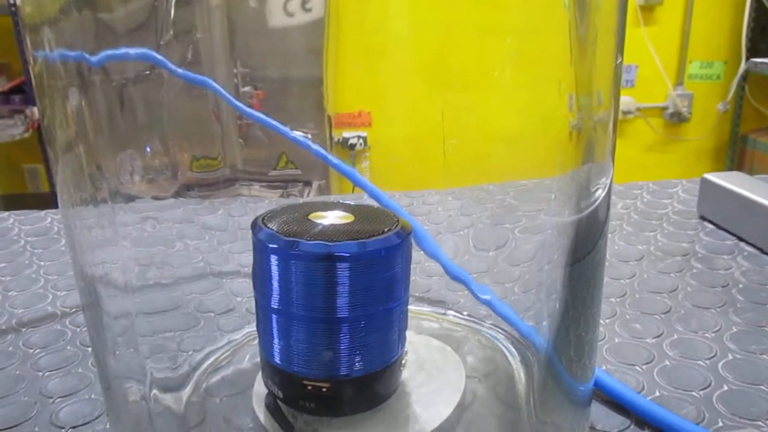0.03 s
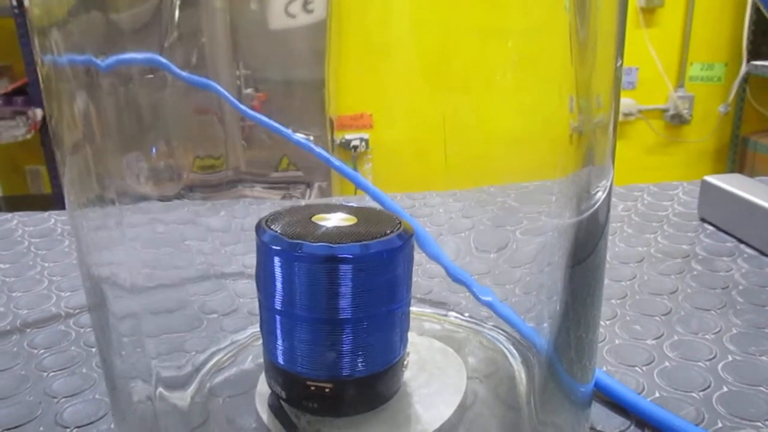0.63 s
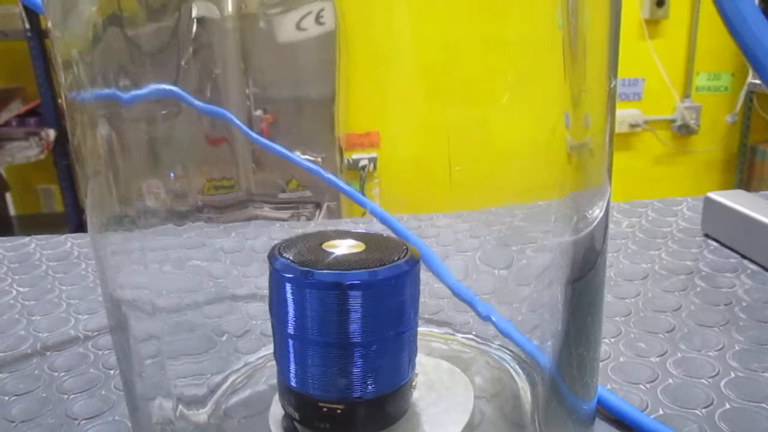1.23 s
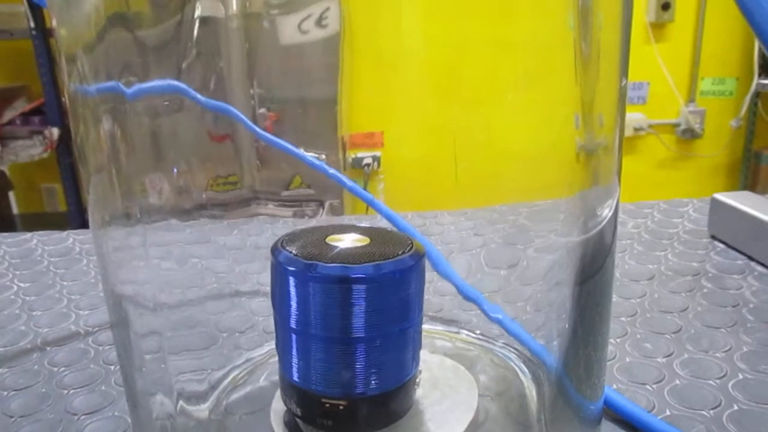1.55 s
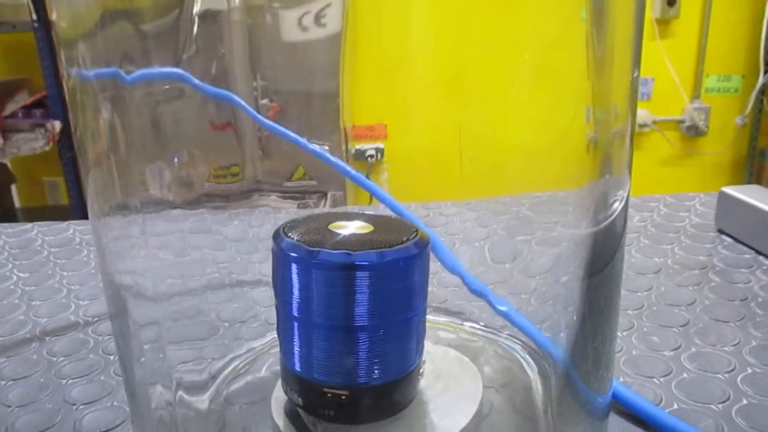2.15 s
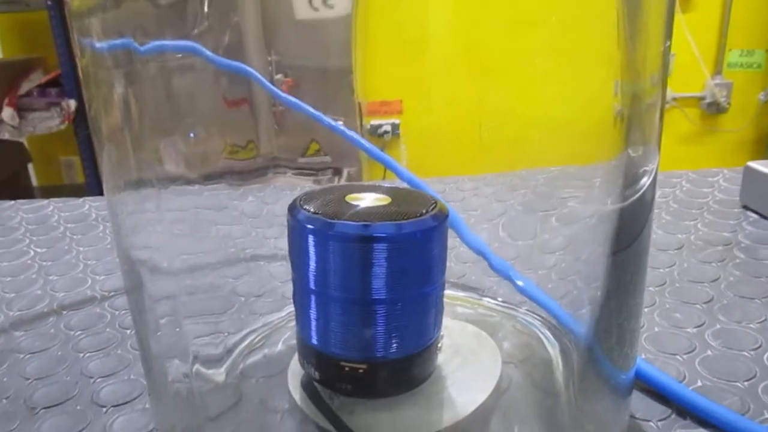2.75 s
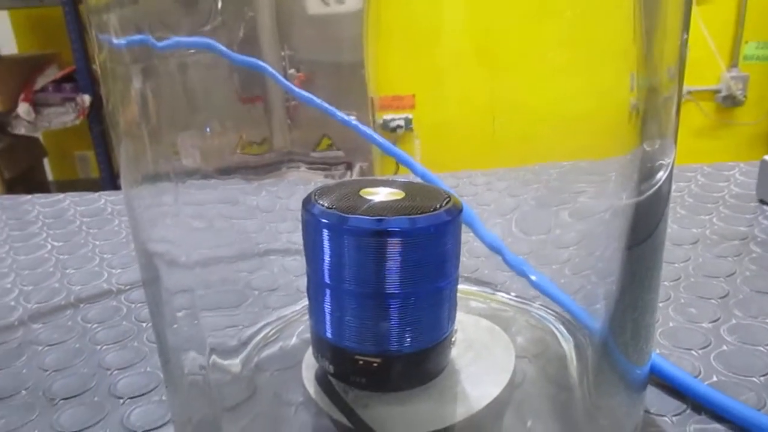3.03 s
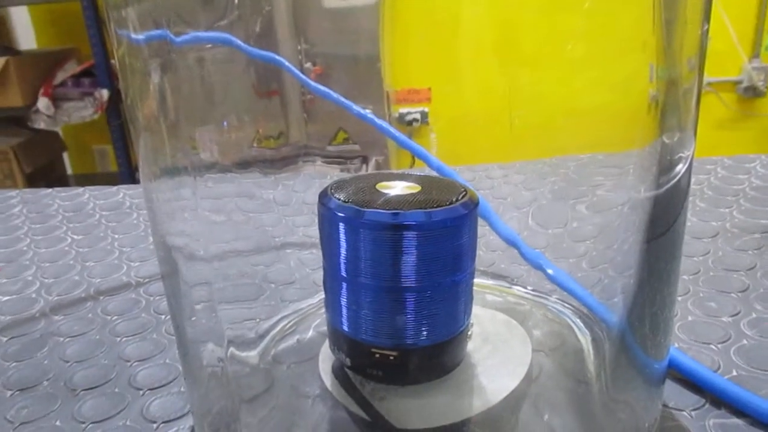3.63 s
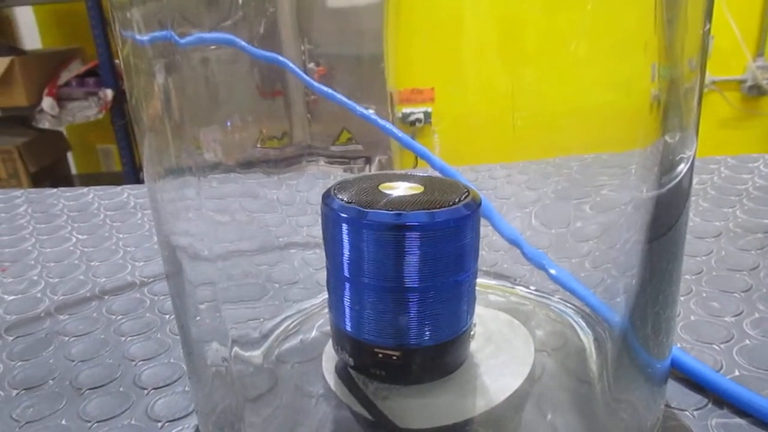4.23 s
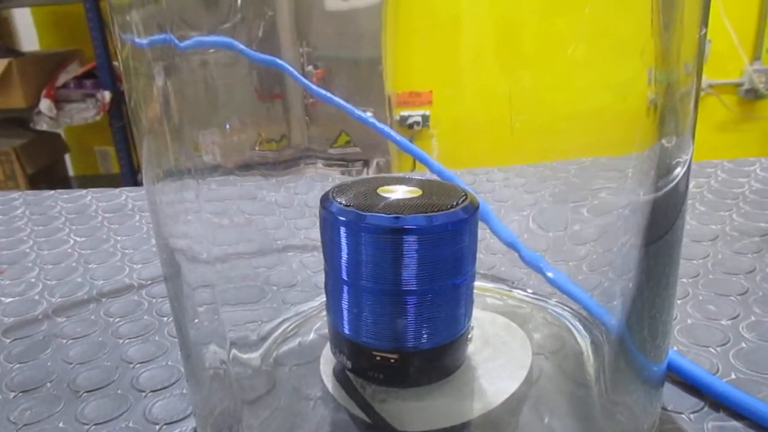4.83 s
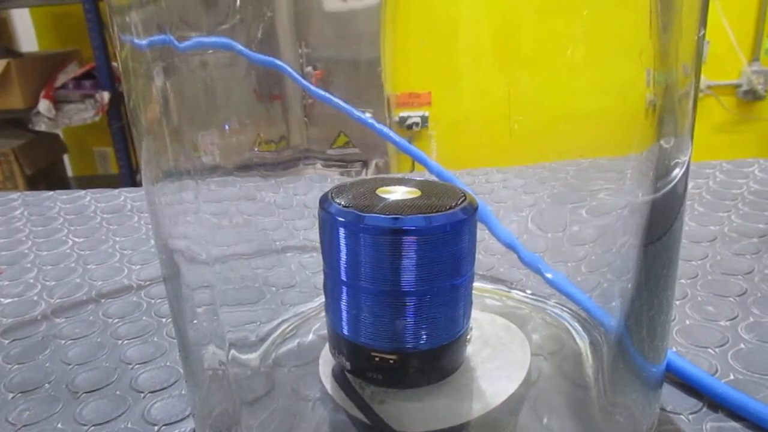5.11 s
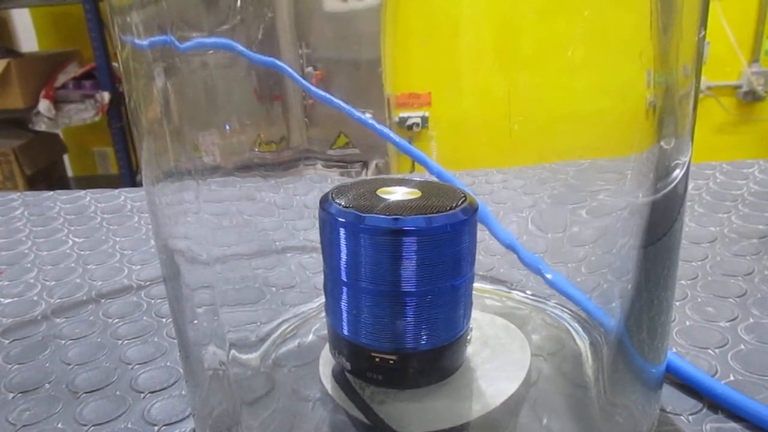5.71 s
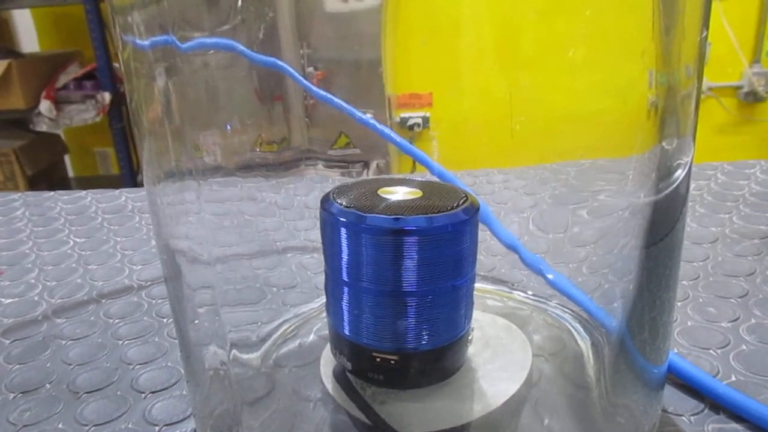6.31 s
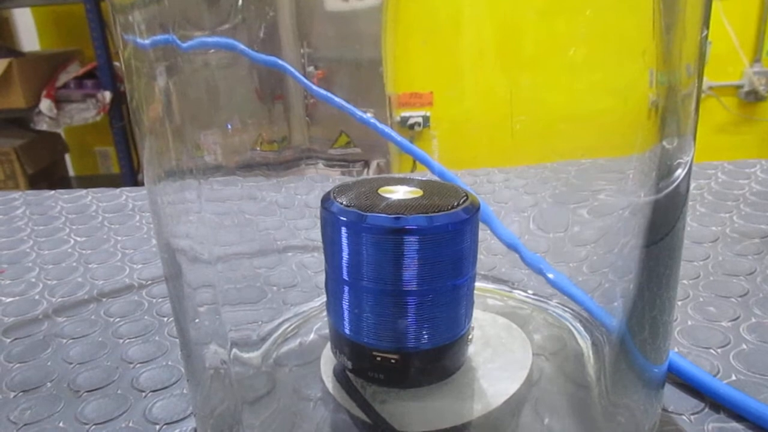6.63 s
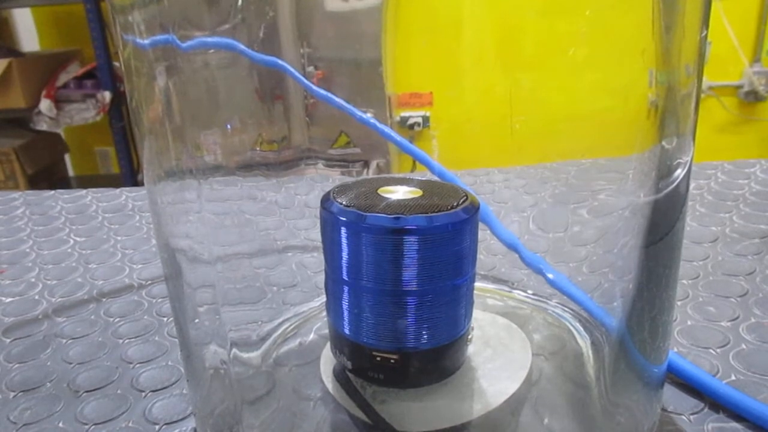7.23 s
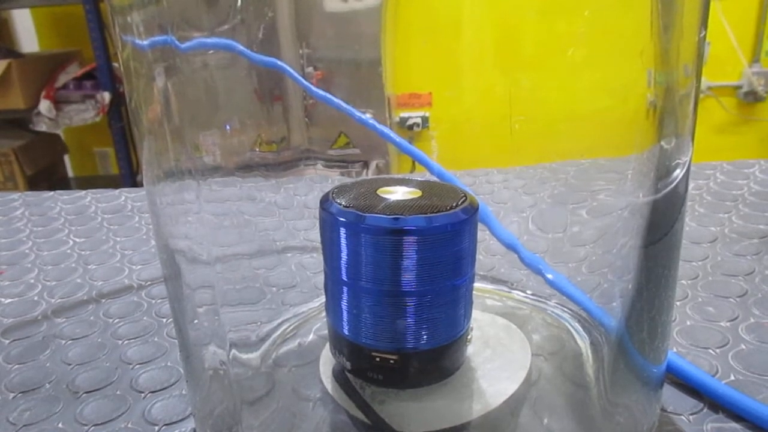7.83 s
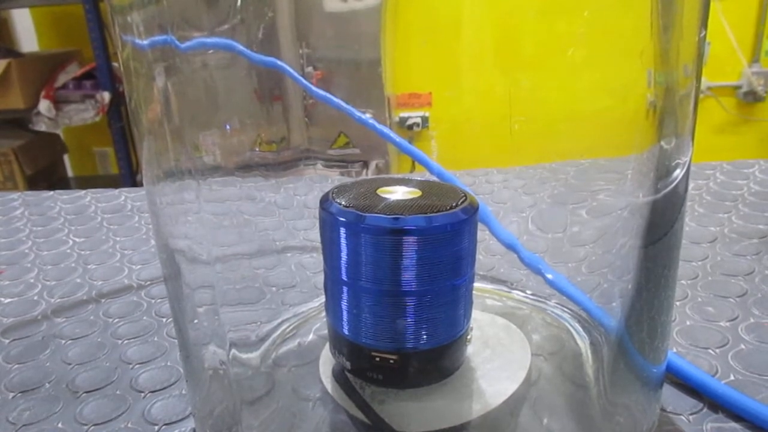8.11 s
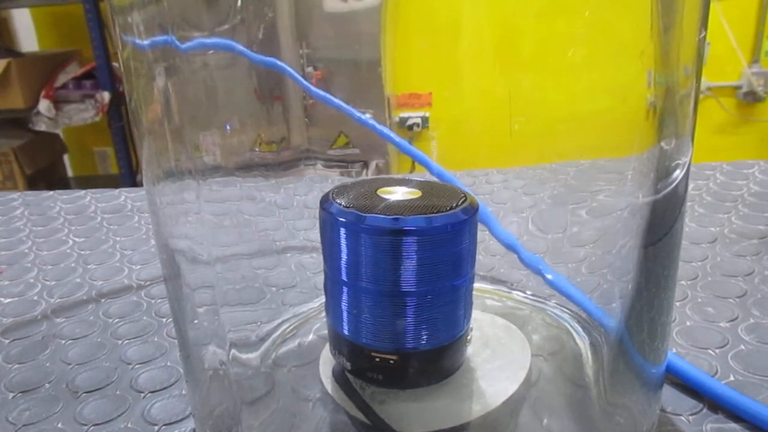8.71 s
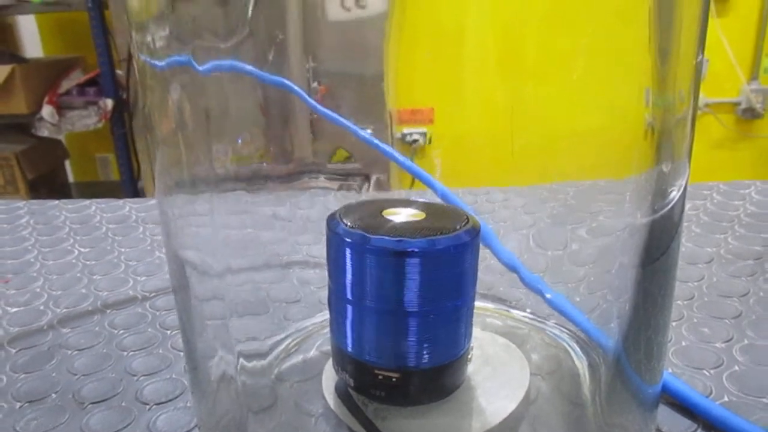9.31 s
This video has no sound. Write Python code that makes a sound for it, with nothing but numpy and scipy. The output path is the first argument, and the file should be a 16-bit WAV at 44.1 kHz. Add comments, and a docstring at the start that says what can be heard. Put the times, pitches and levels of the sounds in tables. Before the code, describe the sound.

A vacuum pump runs in a workshop from the first moment to the end, about nine and a half seconds in all. Its deep motor hum throbs evenly, about six times a second, together with a fast, fine mechanical rattle, a faint pulsing whine and a steady hiss of rushing air. A low, dull street rumble wavers underneath. From about 3 seconds the deep, muffled drone of an engine passing outside grows. It is strongest between 4 and 6 seconds, with short booming surges around 5 seconds, then drops away quickly just after 6 seconds. The street rumble swells a little around 7 seconds and settles. The pump keeps the same speed and level throughout, its rattle changing colour only slightly as the hand-held microphone moves between 2 and 3 seconds and again near the end.

```python
"""A steady, throbbing hum with rattle and rushing air: a rotary-vane vacuum pump in a workshop.
Its vanes stroke twice a shaft turn and beat slowly against the mains hum of the slipping induction
motor; the mechanism rattles alike on every turn. A low street rumble lies underneath.
Midway a deep, muffled drone swells and fades as an engine goes by outside."""
import sys
import numpy as np
from scipy import signal
from scipy.fft import rfft, irfft
from scipy.io import wavfile
from scipy.ndimage import uniform_filter1d

SR = 44100
rng = np.random.default_rng(int(sys.argv[2]) if len(sys.argv) > 2 else 0)


def file_out(sig):
    """Save sig as 16-bit WAV at sys.argv[1]."""
    # one column per channel
    cols = np.atleast_2d(sig).T
    # limit, then scale
    lim = np.clip(cols, -1, 1)
    pcm = np.round(lim * 32767).astype(np.int16)
    wavfile.write(sys.argv[1], SR, pcm)


N = 421596
TIME_S = np.arange(N) / SR
FREQS_HZ = np.maximum(np.fft.rfftfreq(N, 1 / SR), .01)

SHAFT_HZ, MAGNETIC_HZ, TOP_HZ = 56.903, 120.005, 15700
BEAT_ORIGIN_S = .108
SLIP_RAD = 2 * np.pi * (MAGNETIC_HZ - 2 * SHAFT_HZ) * (TIME_S - BEAT_ORIGIN_S)

# pump tones: shaft_multiple, magnetic_multiple, level_db
HUM_TONES = [(2, 0, -15), (0, 1, -37.5), (4, 0, -35), (2, 1, -39), (0, 2, -25.5), (6, -1, -46),
             (5, 0, -65.5), (6, 0, -47.5), (4, 1, -53), (8, -1, -61), (7, 0, -55.5), (8, 0, -46),
             (0, 4, -53), (10, 0, -48), (12, 0, -60), (14, 0, -71), (17, 0, -65.5), (18, 0, -47.5)]
# rattle spectrum: freq_hz, density_db
RATTLE_SPECTRUM = [(600, -100), (1300, -79.5), (2300, -83.5), (3300, -90), (4200, -88.5), (5600, -89.5),
                   (7000, -94), (7700, -89.5), (9300, -94.5), (10700, -100), (11700, -100), (12200, -104),
                   (12700, -103), (15500, -110)]
# ringing casing partials: pitch_hz, level_db
CASING_PARTIALS = [(1254, -59.5), (1367, -68), (1707, -54), (2051, -56.5), (2390, -62), (2632, -60.5),
                   (2848, -58), (2961, -60.5), (3074, -64.5), (3413, -63), (3698, -60.5), (3871, -61.5),
                   (4323, -64), (5351, -62), (5631, -69), (5690, -65.5), (6487, -66), (7230, -78),
                   (7623, -60), (8317, -81), (8877, -77), (9668, -66)]
# air and oil spectrum: freq_hz, density_db
RUSH_SPECTRUM = [(20, -80), (60, -65), (125, -53.5), (170, -62.5), (230, -66.5), (300, -65.5), (480, -72.5),
                 (660, -77), (770, -84.5), (960, -75.5), (1250, -71.5), (1900, -76.5), (2600, -79.5),
                 (3300, -86), (4200, -89), (7700, -90.5), (11000, -101), (15500, -110)]
# casing resonances on the rush: centre_hz, sigma_hz, gain_db
CASING_RESONANCES = [(1068, 24, 8.5), (1733, 52, 4), (2295, 77, 4), (3620, 38, 7), (3870, 77, 9.5),
                     (4400, 60, 8.5), (7530, 120, 2.5), (12300, 170, 5)]
# hand-held microphone, 0 at rest to 1: time_s, offset
MIC_PATH = [(0, 0.9), (2.1, 0.66), (2.7, 0.15), (9.1, 0.1), (9.55, 1)]
# street rumble spectrum: freq_hz, relative_db
STREET_SPECTRUM = [(15, -18), (27, -11), (33, -18), (46, 4), (62, 1.5), (80, 0), (115, -22), (170, -13.5),
                   (260, -34), (500, -66)]
# low swells on the rumble, the one just after the pass being the engine's low throb: centre_s, half_length_s,
# peak_db
LOW_SWELLS = [(.8, 1.7, -40), (4.45, 1.4, -35), (6.85, 2.4, -32), (9.1, 1.2, -38)]
# engine speeding up, then easing off: time_s, cycle_hz
ENGINE_RATE = [(0, 12), (1.5, 12.8), (2.75, 14.95), (4.1, 16.22), (4.75, 16.1), (6.2, 15.2), (7.5, 13.7),
               (9.55, 13)]
# firing harmonics: cycle_multiple, relative_db
FIRING_HARMONICS = [(3, -11), (4, -8), (5, -3), (6, 1), (8, -4), (9, -2), (11, -16), (12, -12), (13, -20),
                    (14, -10), (15, -18), (17, -9), (19, -16), (20, -16), (21, -12), (23, -17), (24, -24)]
# engine boom surges: centre_s, half_length_s, peak_db
BOOM_SURGES = [(2.95, 0.14, -34), (4.2, 0.27, -28.5), (4.42, 0.35, -26.5), (4.92, 0.14, -21),
               (5.17, 0.12, -25), (5.35, 0.31, -28.5), (5.78, .3, -32.5), (6.26, 0.2, -33.5)]


def undb(db):
    """Decibels to gain."""
    return 10 ** (np.asarray(db) / 20)


def unit(x):
    """Scale to rms 1."""
    return x / np.std(x)


def curve(table):
    """A (time_s, value) table at every sample."""
    return np.interp(TIME_S, *np.transpose(table))


def gain_at(hz, spectrum):
    """Gain of a (freq_hz, level_db) outline at hz."""
    freq_hz, level_db = np.transpose(spectrum)
    return undb(np.interp(np.log(hz), np.log(freq_hz), level_db))


def bell(centre_hz, sigma_hz):
    """Gaussian band, peak 1."""
    return np.exp(-((FREQS_HZ - centre_hz) / sigma_hz) ** 2 / 2)


def filtered(x, gains):
    """Apply one gain per frequency bin."""
    return irfft(rfft(x) * gains, N)


def noise(spectrum):
    """Noise with the given density outline."""
    return filtered(rng.standard_normal(N), gain_at(FREQS_HZ, spectrum)) * np.sqrt(SR / 2)


def walk(rate_hz):
    """Smooth random drift, rms 1."""
    lowpass = np.exp(-np.minimum((FREQS_HZ / rate_hz) ** 2, 50))
    return unit(filtered(rng.standard_normal(N), lowpass))


def swells(table):
    """Gain of a row of smooth rises and falls."""
    return sum(undb(peak_db) * np.cos(np.pi / 2 * np.clip((TIME_S - centre_s) / half_s, -1, 1)) ** 4
               for centre_s, half_s, peak_db in table)


def shaft_turns(wobble_turns, jitter_turns, jitter_hz):
    """Shaft angle: surges at the slip beat, trembles with the load."""
    steady_turns = SHAFT_HZ * (TIME_S - BEAT_ORIGIN_S)
    return steady_turns + wobble_turns * np.sin(SLIP_RAD) + jitter_turns * walk(jitter_hz)


def pump_hum(turns, waver_db):
    """Vane strokes, magnetic pull and their combination tones, beating at the slip rate."""
    pull_cycles = MAGNETIC_HZ * (TIME_S - BEAT_ORIGIN_S)
    lag_cycles = rng.random(64)  # one path delay per cluster of neighbouring tones
    tones = 0
    for of_shaft, of_pull, level_db in HUM_TONES:
        cluster = round(of_shaft + 2 * of_pull)
        cycles = of_shaft * turns + of_pull * pull_cycles + lag_cycles[cluster]
        tones += undb(level_db) * np.cos(2 * np.pi * cycles)
    return np.sqrt(2) * tones * undb(waver_db * walk(3.4))


def slot_whine(turns, slots, level_db, depth, limp, lag_rad):
    """Rotor slots cross the pulsing field; the tone chugs with the beat, strong and weak in turn."""
    cycles = slots * turns + MAGNETIC_HZ * TIME_S
    beat_rad = SLIP_RAD - lag_rad
    chug = 1 + depth * np.cos(beat_rad) - limp * np.cos(beat_rad / 2)
    return undb(level_db) * unit(chug * np.cos(2 * np.pi * cycles))


def contact_loop(gains, turns, size=16384):
    """One turn of sliding and tapping with the given order gains, repeated by the shaft."""
    phasors = gains * np.exp(2j * np.pi * rng.random(len(gains)))
    one_turn = irfft(np.r_[0, phasors], size) * size / np.sqrt(2)
    return np.interp(turns % 1, np.arange(size) / size, one_turn)


def pump_rattle(turns, odd_db, uneven_db, beat_depth, sway_depth):
    """Mechanism clatter: two vanes favour even orders; each order pulses with the slip beat."""
    orders = np.arange(1, int(TOP_HZ / SHAFT_HZ))
    gains = gain_at(orders * SHAFT_HZ, RATTLE_SPECTRUM) * np.sqrt(2 * SHAFT_HZ)
    gains *= undb(odd_db * (orders % 2) + uneven_db * rng.standard_normal(len(orders)))
    for pitch_hz, level_db in CASING_PARTIALS:  # casing picks out the nearest order
        gains[round(pitch_hz / SHAFT_HZ) - 1] = undb(level_db)
    # contacts shift with the load each beat; reflections shift as the microphone moves
    sway_rad = 2 * curve(MIC_PATH) + 0.35 * walk(0.39)
    weights = [np.ones(N),
               beat_depth * np.cos(SLIP_RAD), beat_depth * np.sin(SLIP_RAD),
               beat_depth / 2 * np.cos(2 * SLIP_RAD), beat_depth / 2 * np.sin(2 * SLIP_RAD),
               sway_depth * np.cos(sway_rad), sway_depth * np.sin(sway_rad)]
    clatter = sum(weight * contact_loop(gains, turns) for weight in weights)
    return clatter / np.linalg.norm(weights, axis=0)


def air_rush(turns, stroke_db, flicker_db, ripple_db):
    """Air and oil hiss, slightly stronger at each vane stroke, coloured by casing and room."""
    hiss = noise(RUSH_SPECTRUM) * undb(stroke_db * np.cos(4 * np.pi * turns) + flicker_db * walk(12))
    casing_db = sum(db * bell(hz, sigma_hz) for hz, sigma_hz, db in CASING_RESONANCES)
    room_db = ripple_db * unit(uniform_filter1d(rng.standard_normal(len(FREQS_HZ)), size=250))
    return filtered(hiss, undb(casing_db + room_db))


def mic_movement(x, whistle_db, middle_db):
    """Away from rest, the microphone hears less top whistle and more middle."""
    moved = filtered(x, undb(whistle_db * bell(7700, 220) + middle_db * bell(2100, 700)))
    return x + curve(MIC_PATH) * (moved - x)


def street_rumble(level_db, waver_db):
    """Dull, wavering rumble with slow swells; the deepest, just after the engine's pass, is the engine's low
    throb as it leaves."""
    rumble = unit(noise(STREET_SPECTRUM))
    return rumble * (undb(level_db + waver_db * walk(1.5)) + swells(LOW_SWELLS))


def engine_exhaust(cycles, fading, gas_db):
    """Uneven firings and gas puffs through walls; shifting reflections fade each harmonic separately."""
    coarse_s = TIME_S[::2000]
    throb = 0
    for order, relative_db in FIRING_HARMONICS:
        scatter = uniform_filter1d(rng.standard_normal((2, len(coarse_s))), size=9, axis=1)
        depth = fading * np.sqrt(order)  # shorter waves fade more deeply
        direct, echo = (np.interp(TIME_S, coarse_s, depth * unit(row)) for row in scatter)
        phase_rad = 2 * np.pi * (order * cycles + rng.random())
        throb += undb(relative_db) * ((1 + direct) * np.cos(phase_rad) + echo * np.sin(phase_rad))
    gas = unit(noise([(100, -26), (200, 7.5), (290, 6.5), (370, -8.5), (440, 1), (700, -60)]))
    puffs = 1 + np.cos(2 * np.pi * cycles) / 2
    return unit(throb) + undb(gas_db) * gas * puffs


def engine_pass_db(near_s=4.2, hide_s=6.01, drop_s=0.34, drop_db=15.5,
                   approach_db_per_s=5.5, recede_db_per_s=8):
    """Level relative to nearest: grows, holds, drops as if behind a wall, recedes."""
    approach_db = approach_db_per_s * np.maximum(near_s - TIME_S, 0)
    wall_db = drop_db * np.clip((TIME_S - hide_s) / drop_s, 0, 1)
    recede_db = recede_db_per_s * np.maximum(TIME_S - hide_s - drop_s, 0)
    return -(approach_db + wall_db + recede_db)


def passing_engine(exhaust_db, boom_db, boom_order, boom_growth, jitter_cycles):
    """Exhaust drone going by; one harmonic meets a resonance and booms in surges."""
    cycles = np.cumsum(curve(ENGINE_RATE)) / SR + jitter_cycles * walk(10.0)
    exhaust = engine_exhaust(cycles, fading=0.15, gas_db=-19.5)
    boom = unit(np.cos(2 * np.pi * boom_order * cycles))
    pass_db = engine_pass_db()
    boom_gain = undb(boom_db + boom_growth * pass_db) + swells(BOOM_SURGES)
    return exhaust * undb(exhaust_db + pass_db) + boom * boom_gain


def scene():
    """Pump, street and engine, mono."""
    turns = shaft_turns(wobble_turns=0.00047, jitter_turns=0.001, jitter_hz=10.4)
    hum = pump_hum(turns, waver_db=0.5)
    whine = slot_whine(turns, slots=18, level_db=-44.5, depth=0.56, limp=0.027, lag_rad=1.7)
    rattle = pump_rattle(turns, odd_db=-7.0, uneven_db=0.4, beat_depth=0.51, sway_depth=0.42)
    air = air_rush(turns, stroke_db=0.5, flicker_db=-0.14, ripple_db=-0.27)
    pump = hum + whine + mic_movement(rattle + air, whistle_db=-2.5, middle_db=0.5)
    engine = passing_engine(exhaust_db=-21, boom_db=-34, boom_order=18, boom_growth=1.35,
                            jitter_cycles=0.0047)
    street = street_rumble(level_db=-38.5, waver_db=1)
    return (pump + street + engine)[None]


def record(dry):
    """Eased ends, the microphone's narrow treble dip, steep top cut."""
    ease = np.minimum(1, np.minimum(TIME_S, TIME_S[::-1]) / .004)
    dip_db = -13.5 * bell(centre_hz=4850, sigma_hz=266)
    top_cut = signal.ellip(10, .2, 80, TOP_HZ, fs=SR, output="sos")
    return signal.sosfilt(top_cut, filtered(dry * ease, undb(dip_db)))


dry = scene()
out = record(dry)
file_out(out)
```